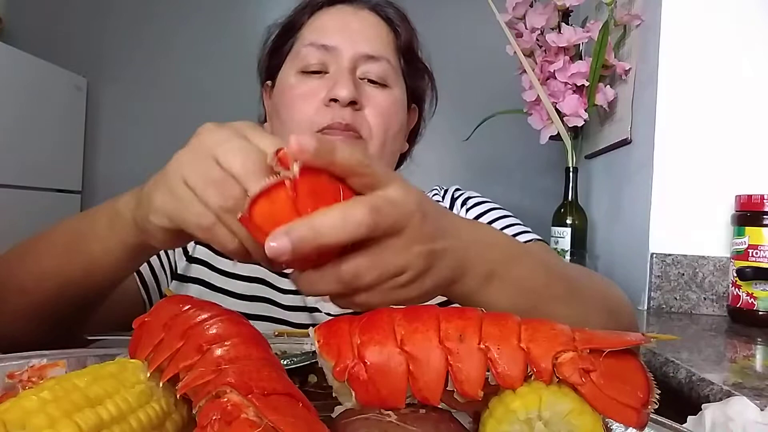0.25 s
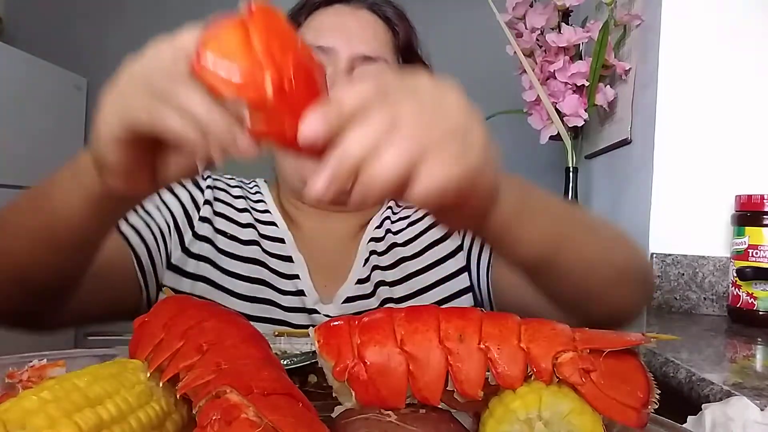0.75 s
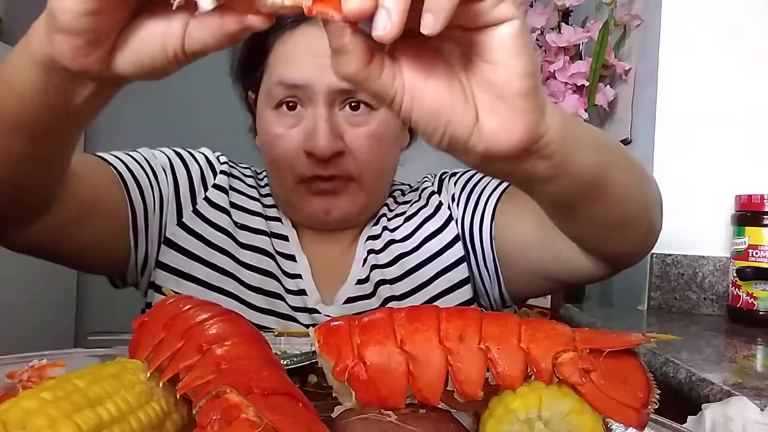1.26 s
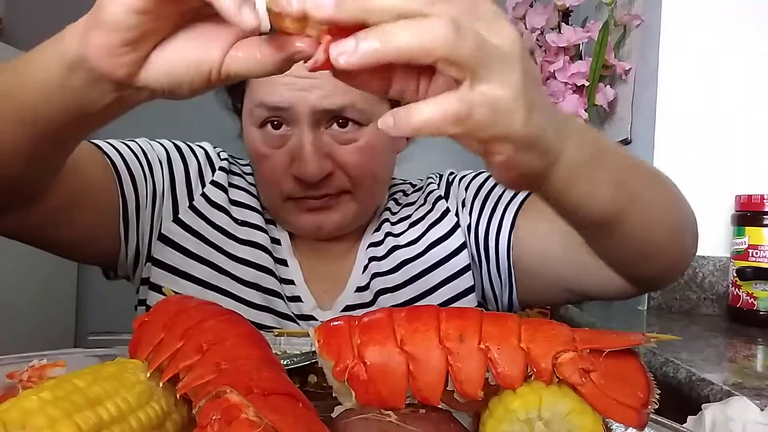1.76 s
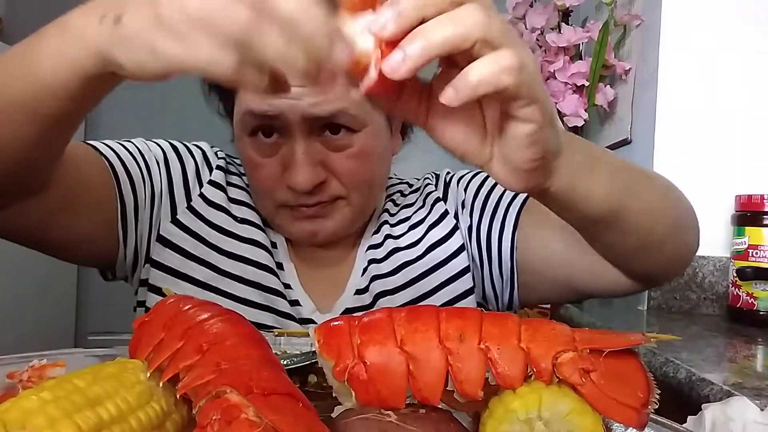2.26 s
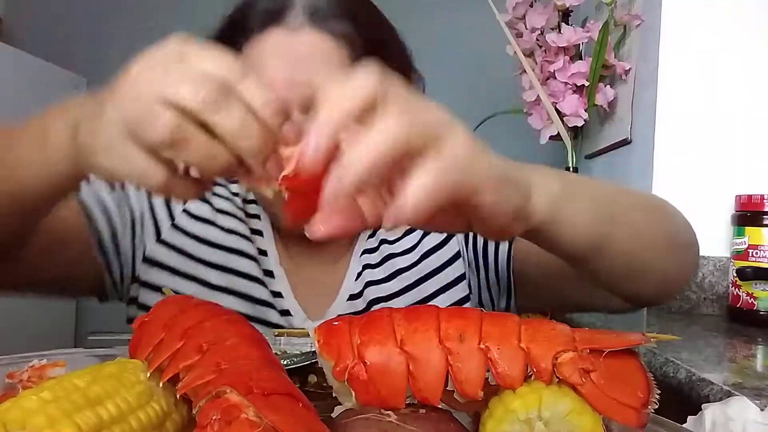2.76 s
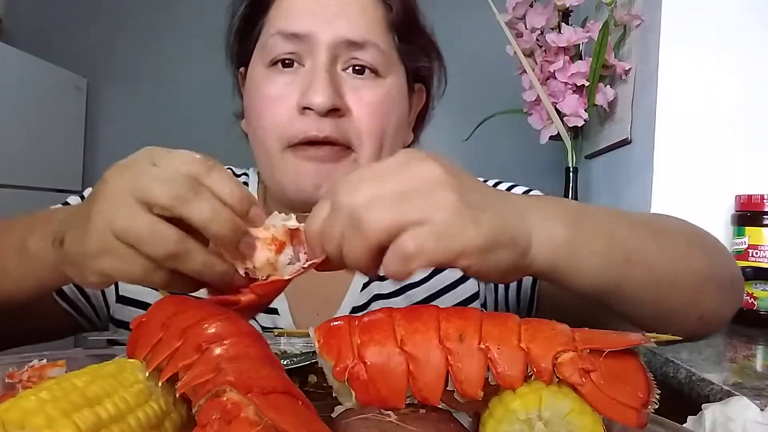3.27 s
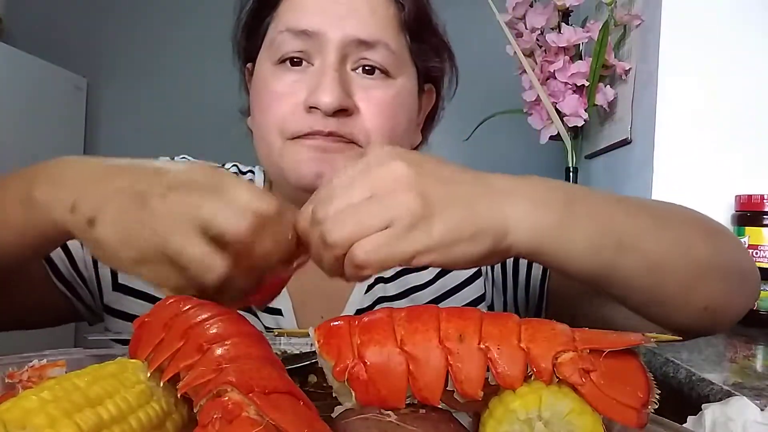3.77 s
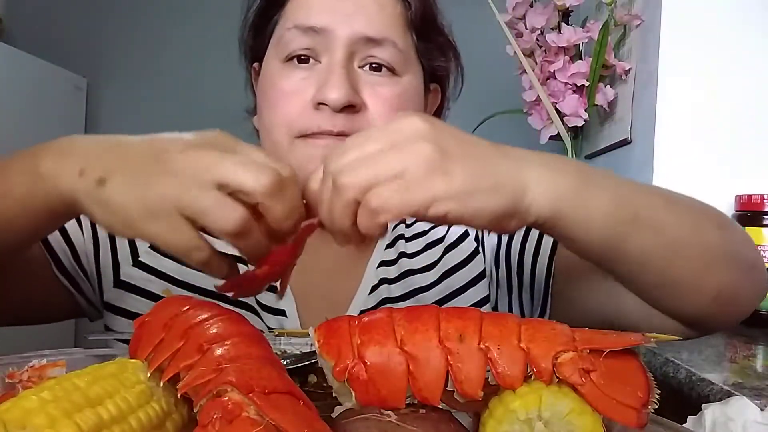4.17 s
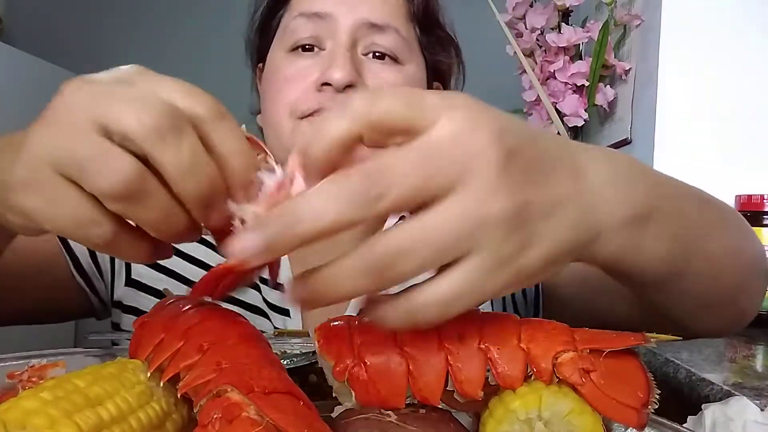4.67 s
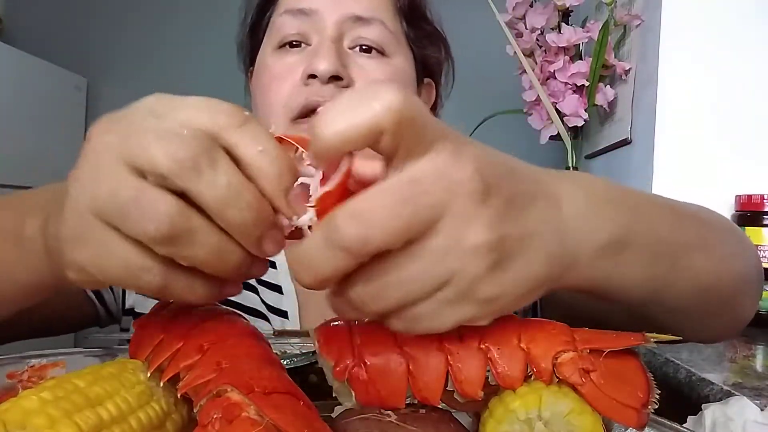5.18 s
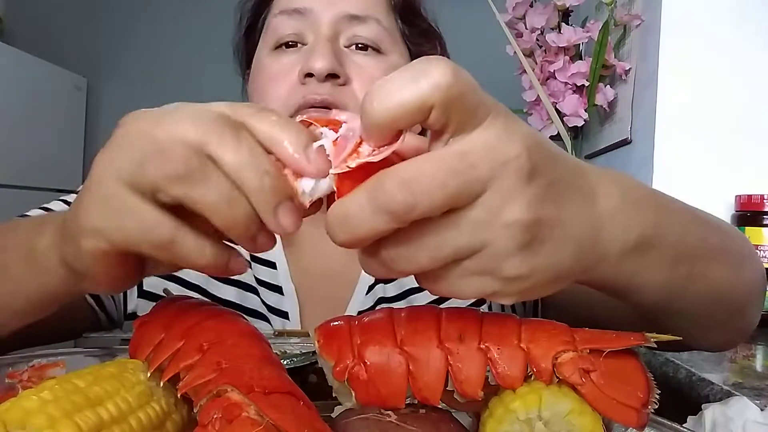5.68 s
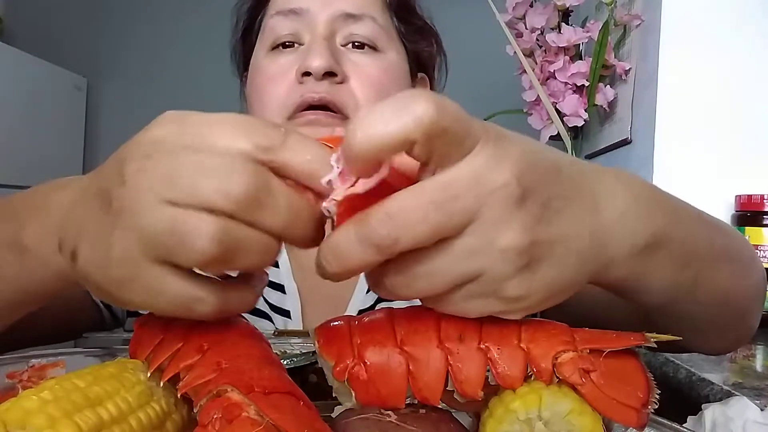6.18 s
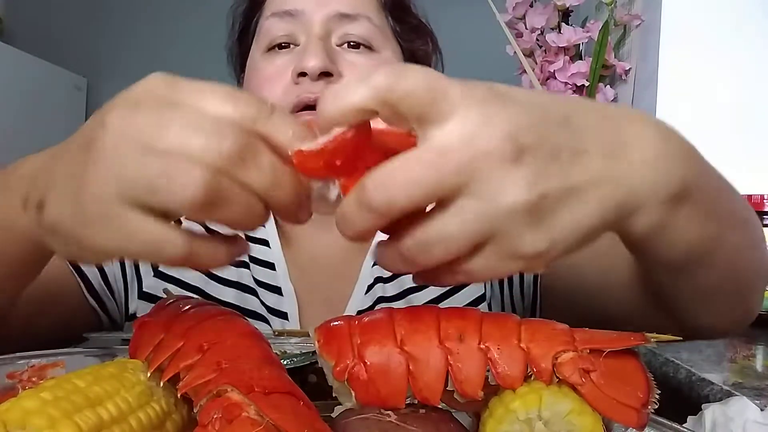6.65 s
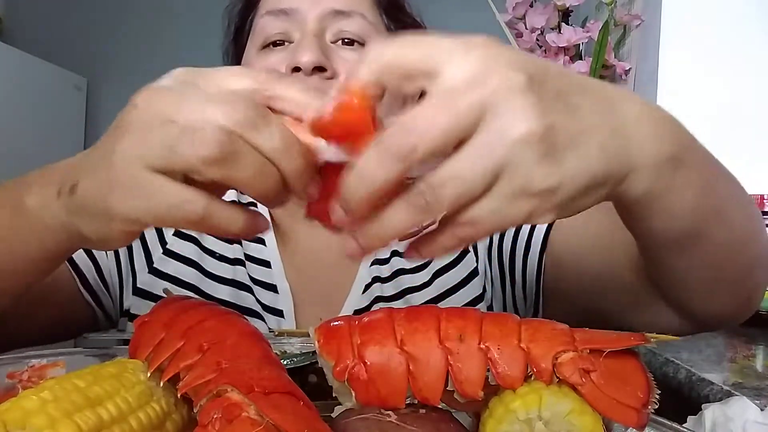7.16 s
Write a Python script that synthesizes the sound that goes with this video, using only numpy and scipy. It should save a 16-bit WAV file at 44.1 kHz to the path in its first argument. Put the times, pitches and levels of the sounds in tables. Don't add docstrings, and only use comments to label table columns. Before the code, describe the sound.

Close brittle shell cracks and tiny ticks over faint air hiss, two big tearing breaks midway, then one last sharp snap.

```python
import sys
import numpy as np
from scipy import signal
from scipy.fft import rfft, irfft, next_fast_len
from scipy.io import wavfile
from scipy.ndimage import uniform_filter1d

SR = 44100
rng = np.random.default_rng(int(sys.argv[2]) if len(sys.argv) > 2 else 0)


def elevation(decibels):
    levels = np.asarray(decibels, float)
    return 10 ** (levels / 20)


def transcribe(u):
    v = np.clip(np.atleast_2d(u).T, -1, 1)
    q = np.round(v * 32767).astype(np.int16)
    wavfile.write(sys.argv[1], SR, q)


N = 327222
LEAD = SR // 5

# pitch_hz, level_db
AIR_COLOUR = [(88, -29.5), (150, -11.5), (213, -4), (376, -10.5), (414, -10.5), (457, -3), (514, -14.5),
              (1140, -6.5), (1310, -17), (2020, -15), (2920, -24.5), (4000, -31.5), (5790, -35.5),
              (13200, -35.5), (16000, -70.5)]
# pitch_hz, share
AIR_LIKENESS = [(60, 0.12), (300, 0.95), (700, 0.47), (1500, 0.038)]
# start_s, hold_s, deep_db, upper_db
RUMBLE = [(0.053, 0.09, -76, -64.5), (0.3, 0.032, -80, -71), (0.627, 0.27, -70, -68.5),
          (1.128, 0.019, -68, -65), (1.331, .01, -60.5, -67.5), (1.716, .01, -71, -78),
          (1.881, 0.089, -59.5, -67.5), (2.167, .01, -74, -69.5), (2.417, 0.23, -58.5, -70),
          (2.772, 0.054, -59.5, -65), (3.07, 0.13, -72, -63), (3.355, 0.032, -61.5, -58.5),
          (3.66, 0.099, -69.5, -60.5), (3.894, 0.22, -74, -61.5), (4.197, 0.0091, -80, -60),
          (4.401, .01, -76.5, -66.5), (4.88, .01, -78, -71), (5.207, 0.011, -88, -68),
          (5.4, 0.011, -73, -83), (5.641, .02, -92, -64.5), (6.242, 0.012, -72, -63.5),
          (6.64, 0.012, -63.5, -79), (7.302, 0.058, -76, -63)]
# start_s, peak_db, pitch_hz, ring_s
KNOCKS = [(0.071, -60, 217, 0.25), (0.313, -59.5, 215, 0.14), (0.625, -57, 227, 0.061),
          (0.19, -53.5, 1300, 0.062), (0.729, -58.5, 478, 0.11), (0.799, -57, 377, 0.089),
          (0.909, -59, 880, 0.066), (1.001, -55, 772, 0.2), (1.039, -52.5, 630, 0.12),
          (1.15, -58.5, 395, 0.12), (1.27, -50.5, 728, 0.22), (1.356, -52.5, 385, 0.13),
          (1.434, -57.5, 634, 0.05), (1.696, -62, 460, 0.18), (2.239, -78, 937, 0.12),
          (2.339, -63, 372, 0.051), (2.529, -60.5, 733, 0.25), (2.633, -56.5, 460, 0.13),
          (2.923, -54.5, 480, 0.15), (2.982, -60.5, 495, 0.1), (4.569, -57.5, 1030, 0.044),
          (4.876, -54, 1050, 0.15), (5.253, -59, 375, 0.059), (6.727, -64.5, 455.6, 0.15),
          (7.28, -55, 246, 0.18), (7.341, -76, 466, 0.034), (7.374, -59.5, 245, 0.11)]
# start_s, hold_s, level_db, pitch_hz
RUSTLE = [(0.0, 0.01, -54, 5600), (0.166, 0.068, -65, 3300), (0.13, 0.26, -70, 14600),
          (0.395, 0.034, -59.5, 4360), (0.612, 0.024, -63.5, 6330), (0.762, .01, -60.5, 12800),
          (0.987, 0.052, -62, 5130), (1.184, 0.011, -54.5, 5200), (1.368, 0.048, -59, 8400),
          (1.692, 0.013, -66.5, 8000), (2.168, 0.011, -58.5, 14000), (2.736, .03, -67.5, 9100),
          (2.89, .02, -65, 12400), (3.166, 0.0062, -51.5, 8700), (3.256, 0.12, -52, 4750),
          (3.696, 0.019, -60, 10840), (3.945, 0.014, -57, 5460), (4.104, 0.069, -47, 6200),
          (4.207, 0.12, -61.5, 15140), (4.37, 0.18, -52.5, 7060), (4.659, 0.015, -60.5, 5170),
          (4.727, 0.026, -70, 14000), (5.074, 0.076, -69.5, 14000), (5.179, 0.068, -56.5, 11840),
          (5.332, 0.063, -75, 14000), (6.3, 0.27, -73.5, 3000), (5.314, 0.062, -59, 3300),
          (5.41, 0.017, -61, 12150), (5.623, 0.13, -59.5, 6500), (5.995, 0.045, -61.5, 8170),
          (6.218, 0.015, -56, 9270), (6.47, 0.022, -67, 11100), (6.877, 0.051, -54, 8100),
          (7.209, 0.033, -48.5, 6540)]
# pitch_hz, fade_s
ROOM_T60 = [(300, 0.28), (1200, 0.26), (3300, 0.2), (4600, 0.24), (8000, 0.26), (14000, 0.31)]
# pitch_hz, level_db
ROOM_COLOUR = [(500, -1), (2500, 1.5), (3400, -0.5), (4300, -2), (4700, -2.5), (5100, 0), (9000, 0.5),
               (15000, -1)]
# pitch_hz, level_db
FRACTURE_COLOUR = [(200, -60.5), (1200, -38), (2300, -9), (5000, -1), (9000, 7), (13000, -5.5),
                   (16000, -16.5)]
# start_s, peak_db, pitch_hz, slip_ms
SPLINTERS = [(0.071, -48, 6200, 4), (0.238, -50, 8650, 2.7), (0.31, -51, 8800, 4), (0.512, -57, 9550, 3),
             (0.669, -44, 9300, 5), (1.345, -42, 14100, 3.6), (1.367, -36, 10500, 4.1),
             (1.397, -44, 10500, 3), (2.172, -46, 10100, 2.8), (3.257, -53, 5000, 2.5),
             (4.3203, -60, 10000, 3.5), (4.342, -48, 13300, 3.5), (4.3809, -11, 10200, 1.4),
             (4.3955, -20, 10250, 1.3), (4.4085, -17, 9530, 1.5), (4.446, -24, 9830, 2.2),
             (5.275, -54.5, 9450, 2.2), (6.0685, -31.5, 11400, 2.6), (6.872, -39.5, 8380, 4),
             (6.891, -41, 9700, 2.5), (6.921, -40, 9000, 3.4), (6.93, -50, 10400, 3),
             (7.045, -49.5, 11770, 7.8), (7.047, -50, 8700, 8), (7.076, -56, 11060, 2.7),
             (0.592, -50, 5800, 2), (1.18, -49, 5600, 2), (1.349, -35.5, 6450, 2), (3.3355, -23, 6200, 1.4),
             (3.472, -50, 10400, 2.5), (3.718, -54, 13100, 4.7), (4.664, -41.5, 4440, 1.8),
             (5.309, -42, 3810, 1.8), (5.627, -21, 2240, 1.75)]
# start_s, length_s, level_db, fall_db_per_s, lowest_hz
AFTERMATH = [(3.33, 0.11, -66, 246, 1600), (3.399, 0.11, -69, 46, 8800), (3.974, 0.2, -68, 30, 9000),
             (4.198, 0.18, -67, 20, 9400), (4.378, 0.18, -27.5, 162.5, 2707),
             (5.632, 0.17, -30.5, 169, 5340), (5.964, 0.055, -74.5, 12.5, 8440),
             (6.018, 0.12, -49.5, 202.5, 3600), (6.868, 0.051, -55, 43, 4980),
             (6.91, 0.093, -50, 233.5, 4350), (7.022, 0.076, -71, 62, 4710),
             (7.203, 0.057, -49, 298.5, 2390)]
# start_s, peak_db, lowest_hz, highest_hz
CHIPS = [(1.1785, -50, 2980, 11900), (1.203, -52, 3000, 12000), (1.3485, -42, 5000, 12000),
         (1.3665, -36, 8000, 12900), (2.173, -52, 7000, 14000), (2.864, -49, 6500, 13000),
         (3.257, -45, 3000, 10000), (3.2715, -43, 7500, 11000), (3.2932, -40, 7000, 9500),
         (3.300, -46, 8000, 10000), (3.3362, -18.5, 2000, 12000), (3.946, -46, 5000, 10000),
         (3.9595, -44, 7500, 10600), (3.9755, -48, 7000, 10000), (4.0425, -45, 8000, 12500),
         (4.1132, -22, 7500, 11000), (4.121, -29, 8500, 11000), (4.3825, -10.5, 8500, 11500),
         (4.4125, -5, 5490, 10990), (4.4225, -18, 8500, 11500), (4.664, -42.5, 3300, 5200),
         (4.6645, -51, 6000, 15050), (4.6845, -52, 4000, 8000), (4.7345, -53, 7000, 15000),
         (5.0835, -57, 9000, 15100), (5.101, -62, 8600, 12000), (5.116, -62, 8530, 11000),
         (5.2055, -51, 3000, 5940), (5.214, -60, 5000, 8080), (5.2325, -57, 11400, 15500),
         (5.2745, -43, 12000, 15400), (5.309, -43, 3000, 7000), (5.408, -53, 7500, 15500),
         (5.423, -51, 5010, 15500), (5.453, -59, 12000, 15400), (5.463, -53, 12000, 15400),
         (6.0125, -39.5, 6000, 14000), (6.0145, -38.5, 3300, 5200), (6.0215, -31.5, 8000, 10900),
         (6.0242, -30, 7500, 10500), (6.2125, -41, 3800, 15000), (6.2595, -53.5, 6480, 12000),
         (6.475, -46, 9000, 15000), (6.595, -64.5, 4000, 10000), (6.8915, -41, 7500, 12500),
         (7.1978, -14, 3100, 10940), (7.2045, -24, 7900, 10900)]
# start_s, peak_db, pitch_hz, held_ms, ring_s
RINGS = [(3.337, -41, 4500, 5, .15), (4.1075, -33, 6200, 2, .06), (4.11, -41, 3300, 5, .12),
         (4.374, -24, 6000, 2, .05), (4.382, -31, 2500, 2, .03), (4.392, -33, 3200, 8, .05),
         (5.6222, -36, 3350, 4, .03), (5.6272, -33, 3300, 2, .17), (5.6302, -12, 9800, 7, .015),
         (5.6445, -31, 3350, 4, .06), (5.660, -22, 9400, 4, .015), (6.0165, -45, 5150, 3, .18),
         (6.865, -45, 8100, 12, .03), (7.199, -42, 3000, 8, .1)]
# start_s, peak_db, flake_hz, broad_share_db
TICKS = [(0.3702, -40, 3520, -3), (0.412, -45, 3440, 4), (0.5912, -39.5, 6200, -39),
         (0.6375, -38.5, 7000, -36), (1.0484, -47, 3900, -3.5), (1.1787, -38.5, 3520, -4),
         (2.762, -46, 3400, -12), (3.2924, -31, 3900, -4), (3.302, -38.5, 6820, 4),
         (4.663, -36.5, 4870, -11.5), (4.8894, -58, 3870, -4.5), (4.9994, -54.5, 3930, -20.5),
         (5.2051, -41, 5000, -26), (5.3088, -38, 3370, -35.5), (5.518, -50.5, 3300, -26),
         (5.5415, -43, 3640, -8)]
# start_s, peak_db, flake_hz, broad_share_db
FLAKES = [(0.1082, -51.5, 9200, 7), (0.281, -61.5, 8950, 16.5), (0.7542, -37, 12300, -8),
          (1.2015, -47.5, 8660, 9), (1.4463, -45.5, 10300, -3), (1.6625, -48, 12800, 1.5),
          (2.4094, -55, 10200, -1), (2.5704, -47, 10400, -11), (2.7194, -47, 10500, -14),
          (2.7535, -41.5, 10700, -16), (3.1672, -42, 12300, 0), (3.545, -50, 11600, -9),
          (4.7341, -47, 9460, -19), (5.0635, -53.5, 8810, 0), (5.1417, -47, 9800, -1),
          (5.2745, -56.5, 14800, 7), (5.4213, -59, 9200, 13), (6.2762, -50.5, 9860, 5.5),
          (6.4577, -41, 10020, -8.5), (6.9474, -42.5, 8790, -10), (7.043, -55, 8600, 11),
          (7.3966, -50, 9730, -3.5)]
# start_s, peak_db, flake_hz, broad_share_db
SCRAPES = [(0.181, -53, 3600, -26), (0.4238, -36, 3240, -4), (0.991, -59.5, 10000, 15),
           (1.3495, -30, 7900, -33), (1.9914, -65, 8600, 15), (2.173, -51, 8100, 2.5),
           (2.8653, -47.5, 9900, 0), (3.257, -42.5, 3160, -0.5), (3.703, -49, 7840, -1),
           (3.9495, -35.5, 8670, 1.5), (4.0417, -45, 10900, -2)]
# start_s, peak_db,
# lowest_hz, highest_hz
THUMPS = [(3.335, -25, 800, 2640), (4.374, -37.5, 200, 460), (5.627, -36.5, 150, 400),
          (3.340, -37.5, 221, 407), (4.1, -31, 710, 2430), (4.107, -23.5, 895, 2600),
          (4.3727, -25.5, 700, 1996), (4.4127, -30, 500, 2006), (5.611, -29.5, 700, 2000),
          (5.6260, -21.5, 400, 1906), (5.6286, -15.5, 3060, 3480), (6.0144, -40, 2670, 3700),
          (7.1977, -17.5, 3500, 5150)]
# start_s, peak_db, hollow_hz, hollow_db,
# brightness_db_per_octave
CRACKS = [
    (-0.066, -6, 6360, -11.5, 2),
    (3.2799, -30, 4460, -7.5, -9),
    (3.3348, -14, 3200, -15, -8.5),
    (4.1007, -13.5, 3470, -13.5, -1),
    (4.107, -9, 8450, -11.5, -2),
    (4.1122, -20.5, 4630, -4.5, -2),
    (4.3727, 4.5, 2134, -25.5, 6),
    (5.6106, -7, 3904, -22, 0),
    (5.6260, 3, 3213, -20, 9),
    (6.2123, -31, 4530, -13.5, 13),
          (4.3934, -14, 2463, -18, -10.5),
    (4.408, -11, 3870, -15, -7.5),
    (4.413, -9, 6400, -17.5, 0),
    (4.4224, -10.5, 4300, -21, -5),
    (5.6627, -19.5, 3480, -25, 3),
    (6.0147, -14.5, 5600, -24, 4),
    (6.864, -29, 4090, -34, 3.5),
    (6.911, -31.5, 4410, -61.5, 3),
    (7.198, -6.5, 5470, -8.5, 1),
    (7.2061, -27, 5280, -13, -12.5),
]
# start_s, first_step_db, hollow_hz, hollow_db, brightness_db_per_octave
TEARS = [
    (4.371, -1, 3300, -19.5, 2),
    (5.6260, -7, 3300, -23.5, 5.5),
]
# pitch_hz, level_db
LEFT_PORT = [(100, 5), (600, 1), (2400, 0.5), (4600, 3.5), (8200, 3.5), (9600, 8), (10700, 7), (15000, 5)]
RIGHT_PORT = [(100, 0), (600, -5), (2400, -5), (5000, 1.5), (8000, -8), (12000, -17), (15000, -13)]


def curve(table, hz):
    points = np.array(table, float)
    return np.interp(np.log(np.maximum(hz, 1)), np.log(points[:, 0]), points[:, 1])


def colour(x, table):
    cepstrum = irfft(np.log(elevation(curve(table, np.fft.rfftfreq(2048, 1 / SR)))))
    cepstrum[1:1024] *= 2
    cepstrum[1025:] = 0
    response = irfft(np.exp(rfft(cepstrum)))[:1024]
    return signal.fftconvolve(x, response)[:len(x)]


def band(x, lo_hz, hi_hz, order=2):
    edges = np.clip([lo_hz, hi_hz], 20, .48 * SR)
    return signal.sosfilt(signal.butter(order, edges, "band", fs=SR, output="sos"), x)


def unit(x):
    return x / np.sqrt(np.mean(x ** 2))


def peak(x, db):
    return x * elevation(db) / np.max(np.abs(x))


def add(track, start_s, x):
    i = int((start_s - .0002) * SR) + LEAD
    track[i:i + len(x)] += x[:len(track) - i]


def decay(t, t60):
    return np.exp(-np.log(1000) * t / t60)


def pair(like, size):
    noise = rng.standard_normal((3, size))
    return np.sqrt(like) * noise[2] + np.sqrt(1 - like) * noise[:2]


def swells(start, hold, top_db, rest_db, rise_db_s, fall_db_s):
    t = np.arange(0, N + 64, 64) / SR
    early = np.maximum(start[:, None] - t, 0)
    late = np.maximum(t - (start + hold)[:, None], 0)
    db = np.max(top_db[:, None] - rise_db_s * early - fall_db_s * late, axis=0)
    return elevation(np.interp(np.arange(N) / SR, t, np.maximum(db, rest_db)))


def air():
    size = next_fast_len(N, True)
    hz = np.fft.rfftfreq(size, 1 / SR)
    like = np.clip(curve(AIR_LIKENESS, hz), 0, 1)
    noise = rfft(rng.standard_normal((3, size)))
    hiss = np.sqrt(like) * noise[2] + np.sqrt(1 - like) * noise[:2]
    hiss = hiss * elevation(curve(AIR_COLOUR, hz)) * (hz < 12800)
    octave = np.clip(np.log2(hz / 200 + 1e-9).astype(int), 0, 5)
    flicker = uniform_filter1d(rng.standard_normal((6, N)), size=3000)
    total = np.zeros((2, N))
    for k in range(6):
        total += irfft(hiss * (octave == k), size)[:, :N] * elevation(0.88 * unit(flicker[k]))
    return unit(total) * elevation(-67)


def rumble():
    start, hold, deep_db, upper_db = np.transpose(RUMBLE)
    deep = swells(start, hold, deep_db, rest_db=-79, rise_db_s=303, fall_db_s=381.5)
    upper = swells(start, hold, upper_db, rest_db=-73, rise_db_s=131, fall_db_s=148.5)
    floor = unit(band(pair(0.89, size=N), 48, 70)) * deep * elevation(np.array([[6], [9.5]]))
    walls = unit(band(pair(0.8, size=N), 90, 150)) * upper * elevation(4.0)
    return floor + walls


def knocks():
    track, t = np.zeros(N + LEAD), np.arange(SR // 4) / SR
    for start_s, db, hz, t60 in KNOCKS:
        noise = rng.standard_normal(len(t))
        swell = (1 - np.exp(-t / 0.022)) * decay(t, max(t60, .03))
        ring = band(noise, hz / 1.078, hz * 1.057) * swell
        thud = band(noise, hz / 1.14, hz * 1.36) * swell
        add(track, start_s, peak(ring, db) + peak(thud, db + 3.0))
    return track[LEAD:] * np.array([[1], [.8]])


def rustle():
    start, hold, db, hz = np.transpose(RUSTLE)
    grains = rng.standard_normal((2, N)) * elevation(1.6 * rng.exponential(size=N))

    def layer(lo_hz, hi_hz, grain_hz, off_db, rest_db):
        top_db = db - 5.5 - off_db * np.abs(np.log2(hz / grain_hz))
        gain = swells(start, hold, top_db, rest_db, rise_db_s=1097.5, fall_db_s=151.5)
        return unit(band(grains, lo_hz, hi_hz)) * gain

    dull = layer(2200, 4100, grain_hz=3300, off_db=11, rest_db=-89)
    crisp = layer(5000, 8300, grain_hz=6200, off_db=9, rest_db=-89)
    finest = layer(11800, 47000, grain_hz=14000, off_db=14, rest_db=-108)
    return dull - crisp + finest


def room():
    t = np.arange(SR // 2) / SR
    lumps = elevation(9.7 * unit(uniform_filter1d(rng.standard_normal((2, len(t))), size=40)))
    envelope = elevation(-13) + elevation(-14) * lumps * np.exp(-t * 1000 / 13)
    echo = np.zeros((2, len(t)))
    for hz in 125 * 2. ** np.arange(0, 7.2, .5):
        noise = pair(np.clip(curve(AIR_LIKENESS, hz), 0, 1), size=len(t))
        echo += band(noise, hz / 2 ** .25, hz * 2 ** .25) * decay(t, curve(ROOM_T60, hz))
    echo *= envelope * np.clip((t - .0006) / 0.0012, 0, 1) * 0.09
    echo *= np.exp(-(t / 0.27) ** 4)
    echo = np.array([colour(side, ROOM_COLOUR) for side in echo])
    echo[1, [0, 13]] += .7, .35
    echo[0, 30] += 1
    return echo


def split(noise, ms, rise_ms):
    t_ms = np.arange(len(noise[0])) / SR * 1000
    clicks = noise[0] * elevation(5.9 * np.clip(noise[1], -2, 2))
    spectrum = rfft(clicks * (1 - np.exp(-t_ms / rise_ms)) * np.exp(-t_ms / ms))
    return irfft(spectrum / np.abs(spectrum)) * np.exp(-t_ms / ms / 3)


def splinters():
    track, t = np.zeros(N + LEAD), np.arange(SR // 4) / SR
    for start_s, db, hz, ms in SPLINTERS:
        x = split(rng.standard_normal((2, 2048)), .5 * ms, rise_ms=0.24 * ms)
        add(track, start_s, peak(band(x, hz / 1.25, hz), db - 7.0))
    for start_s, length_s, db, fall_db_s, lo_hz in AFTERMATH:
        size_db = 2.5 * np.minimum(rng.exponential(size=len(t)), 4)
        grains = rng.standard_normal(len(t)) * elevation(size_db)
        edge = band(colour(grains, FRACTURE_COLOUR), lo_hz, 15500, order=4)
        add(track, start_s, unit(edge) * elevation(db - fall_db_s * t) * np.exp(-(t / length_s) ** 6))
    return track


def chips():
    track, t = np.zeros(N + LEAD), np.arange(SR // 4) / SR
    for start_s, db, lo_hz, hi_hz in CHIPS:
        x = split(rng.standard_normal((2, 512)), ms=0.34, rise_ms=0.045)
        add(track, start_s, peak(band(x, lo_hz, hi_hz), db))
    for start_s, db, hz, held_ms, t60 in RINGS:
        fade = decay(np.maximum(t - held_ms / 1000, 0), max(t60, .01))
        ring = unit(band(rng.standard_normal(len(t)), hz / 1.033, hz * 1.033))
        add(track, start_s, ring * fade * elevation(db - 6.5))
    return track


def ticks(track, table, slip_ms):
    for start_s, db, hz, broad_db in table:
        x = split(rng.standard_normal((2, 4096)), .5 * slip_ms, rise_ms=0.084 * slip_ms)
        flake = peak(band(x, hz / 1.22, hz * 1.166), db - 8.5)
        add(track, start_s, flake + peak(colour(x, FRACTURE_COLOUR), db + broad_db - 6.5))


def fractures():
    tears = []
    for start_s, db, hz, cup_db, tilt_db in TEARS:
        for k, delay_ms in enumerate([1.6, 4.1, 6.6, 9.5]):
            tears.append((start_s + delay_ms / 1000, db - k * 4.5, hz, cup_db, tilt_db))
    return [*CRACKS, *tears]


def shell():
    track = np.zeros(N + LEAD)
    for start_s, db, hz, cup_db, tilt_db in fractures():
        x = split(rng.standard_normal((2, 2048)), ms=0.76, rise_ms=0.63)
        tilted = [(f, g + tilt_db * np.log2(f / 6000)) for f, g in FRACTURE_COLOUR]
        snap = peak(colour(x, tilted), db - 5.0)
        cup = peak(band(x, hz / 1.19, hz * 1.195), db + cup_db + 2.0)
        add(track, start_s, snap + cup)
    for start_s, db, lo_hz, hi_hz in THUMPS:
        x = split(rng.standard_normal((2, 2048)), ms=0.98, rise_ms=0.15)
        add(track, start_s, peak(band(x, lo_hz, hi_hz), db))
    ticks(track, TICKS, slip_ms=5.8)
    ticks(track, FLAKES, slip_ms=1.1)
    ticks(track, SCRAPES, slip_ms=14.8)
    return track


def scene():
    background = air() + rumble() + knocks() + rustle()
    echoes = room()
    after_direct = np.arange(echoes.shape[1]) > 30
    near_echoes = echoes * np.where(after_direct, elevation(-8), 1)
    close = chips()
    dry = splinters() + shell()
    heard = [signal.fftconvolve(dry, far) + signal.fftconvolve(close, near)
             for far, near in zip(echoes, near_echoes)]
    return np.array(heard)[:, LEAD:LEAD + N] + background


def thin_out(ports):
    sum_and_difference = np.array([ports[0] + ports[1], ports[0] - ports[1]]) / 2
    hz, _, bins = signal.stft(sum_and_difference, SR, nperseg=1024)
    power = uniform_filter1d(np.abs(bins) ** 2, size=5, axis=2)
    strip = np.arange(len(hz)) // 6 * 6 + 3
    strips = uniform_filter1d(power, size=6, axis=1)[:, np.minimum(strip, len(hz) - 1)]
    whim = unit(uniform_filter1d(rng.standard_normal(strips[0].shape), size=6))
    whim_db = 2.5 * whim[strip % len(hz)]
    faint = elevation(2 * -78)
    cover = elevation(2 * (-5.5 + whim_db)) * uniform_filter1d(power[1], size=64, axis=0)
    hidden = strips[0] < np.minimum(cover, faint)
    bins[0][hidden & ((hz > 2300) & (hz < 14500))[:, None]] *= .1
    weak = power < np.minimum(elevation(2 * -2.5) * strips, faint)
    bins[weak & (hz > 2300)[:, None]] *= .2
    shut = strips.sum(0) < elevation(2 * (-107 + whim_db))
    bins[:, shut & (hz > 12800)[:, None]] = 0
    mid, side = signal.istft(bins, SR, nperseg=1024)[1][:, :N]
    return np.array([mid + side, mid - side])


def top_cut(x):
    return signal.sosfilt(signal.butter(12, 16960, fs=SR, output="sos"), x)


def record(dry):
    ports = np.array([colour(dry[0], LEFT_PORT), -colour(dry[1], RIGHT_PORT)])
    low_pass = signal.ellip(7, .2, 48, 15600, fs=SR, output="sos")
    cut = signal.sosfilt(low_pass, ports)
    mix = np.clip(thin_out(cut), -1, 1)
    return top_cut(mix)


dry = scene()
out = record(dry)
transcribe(out)
```